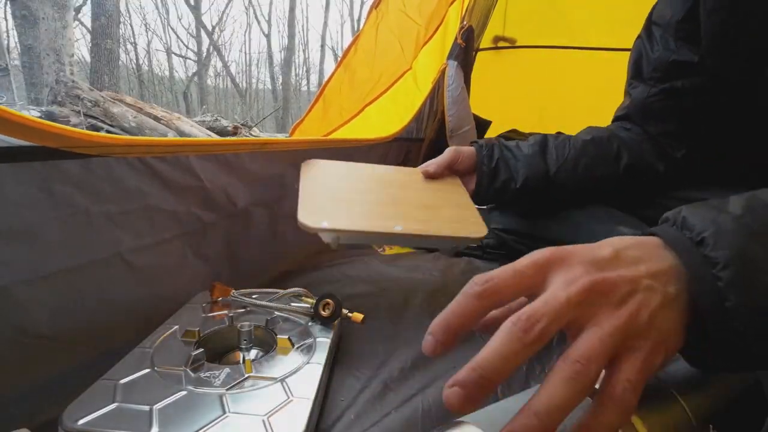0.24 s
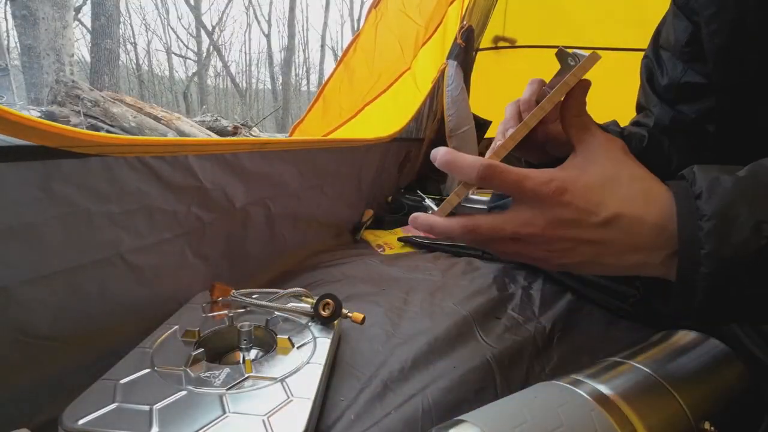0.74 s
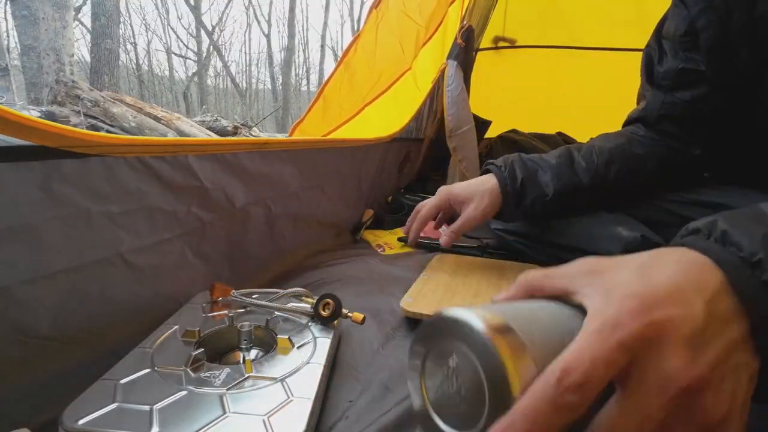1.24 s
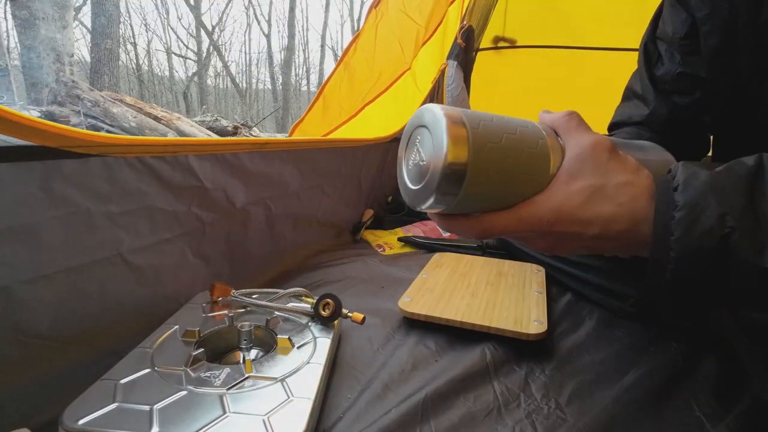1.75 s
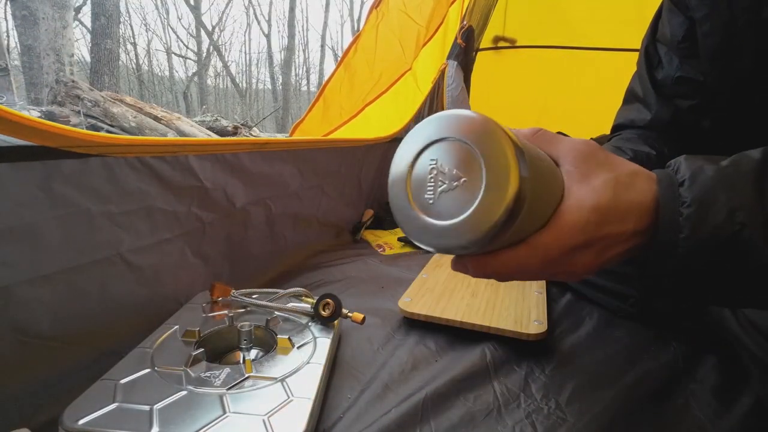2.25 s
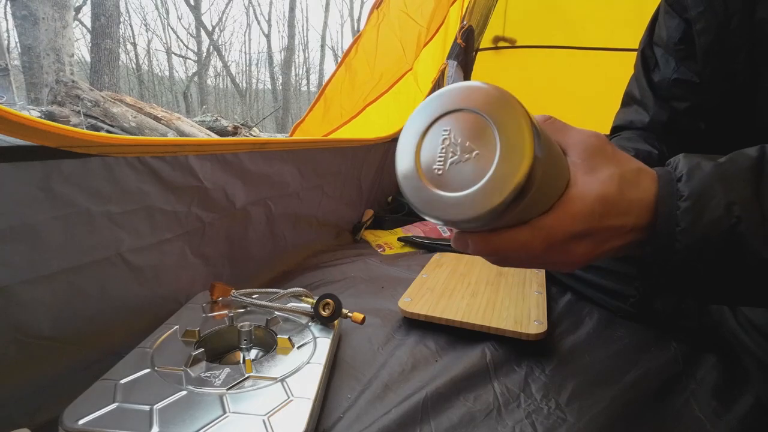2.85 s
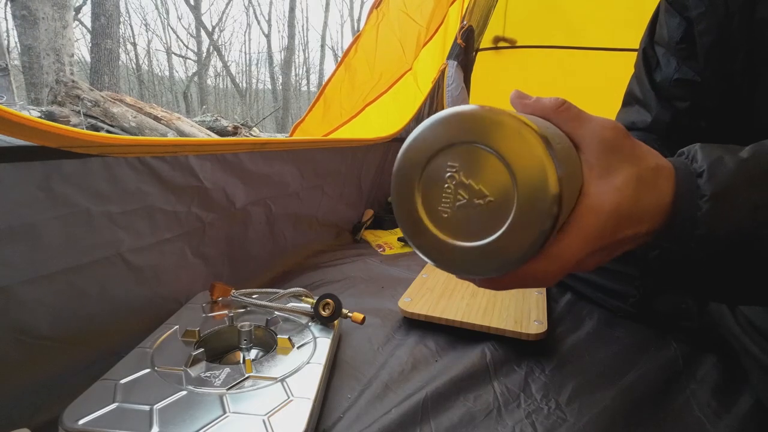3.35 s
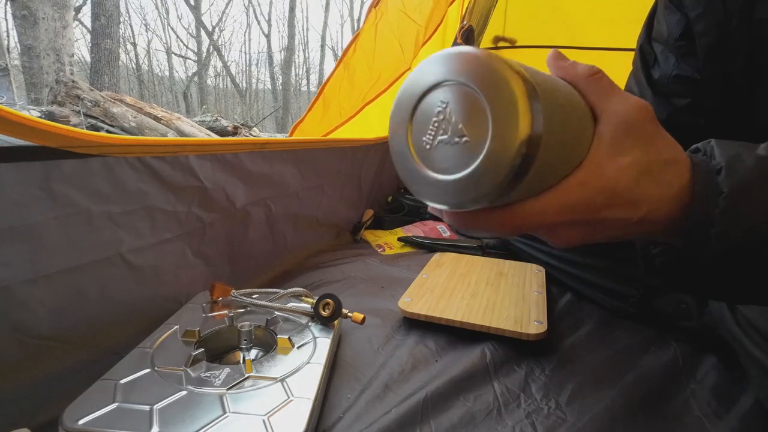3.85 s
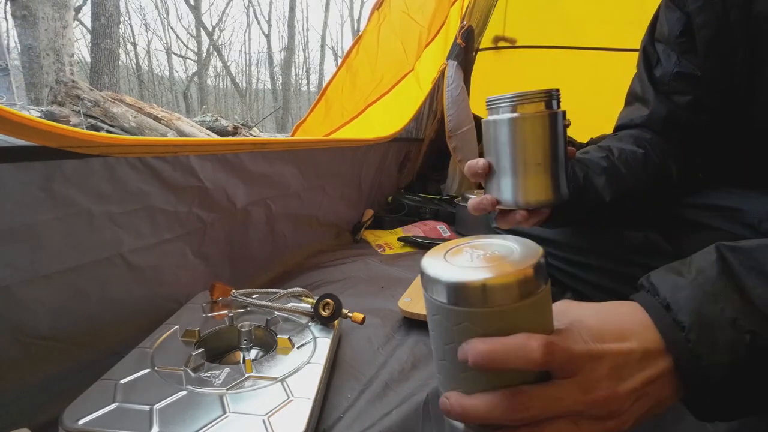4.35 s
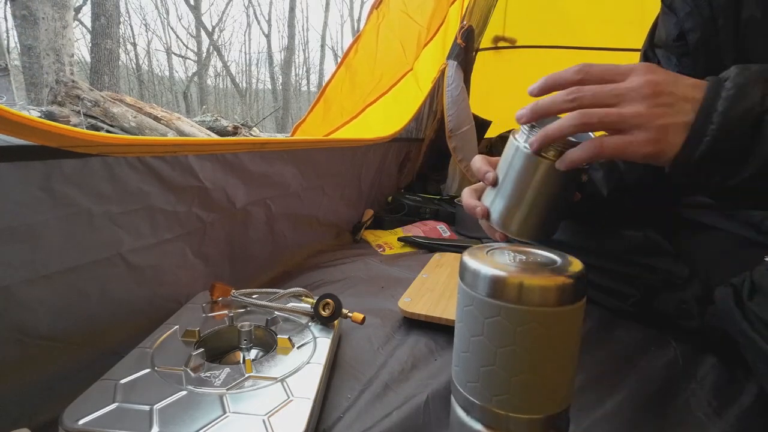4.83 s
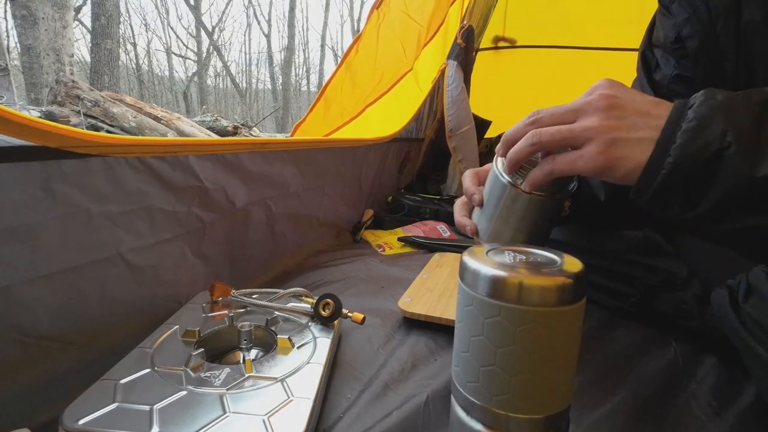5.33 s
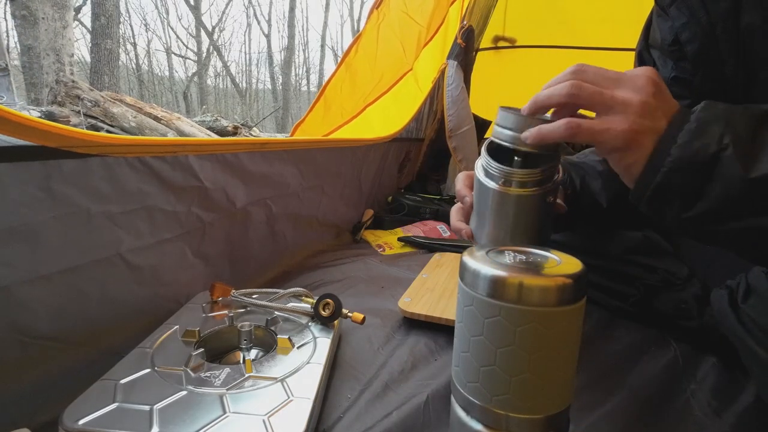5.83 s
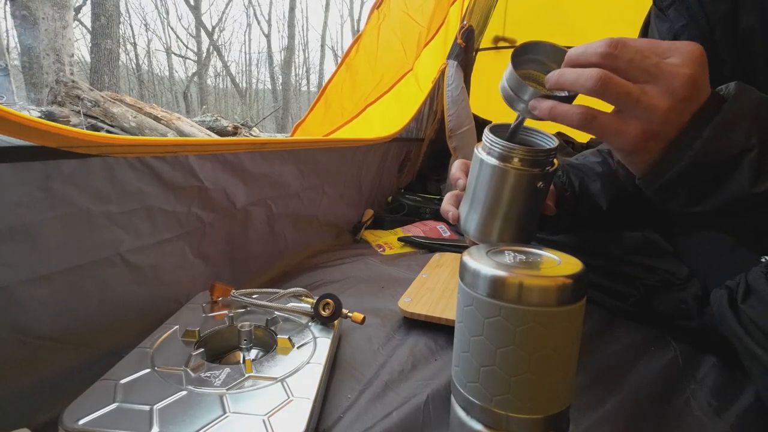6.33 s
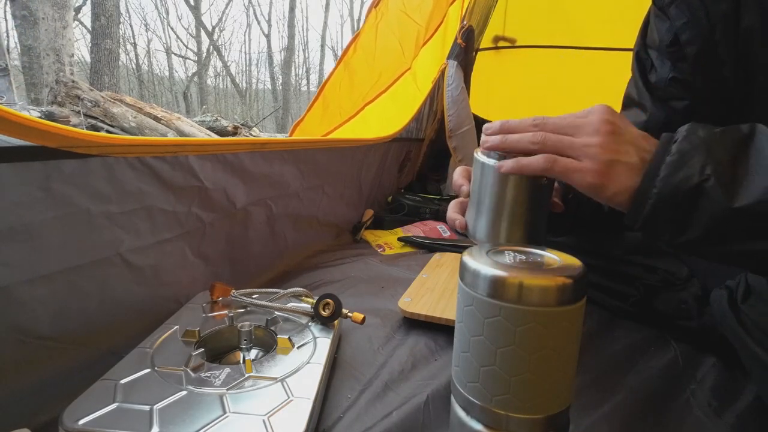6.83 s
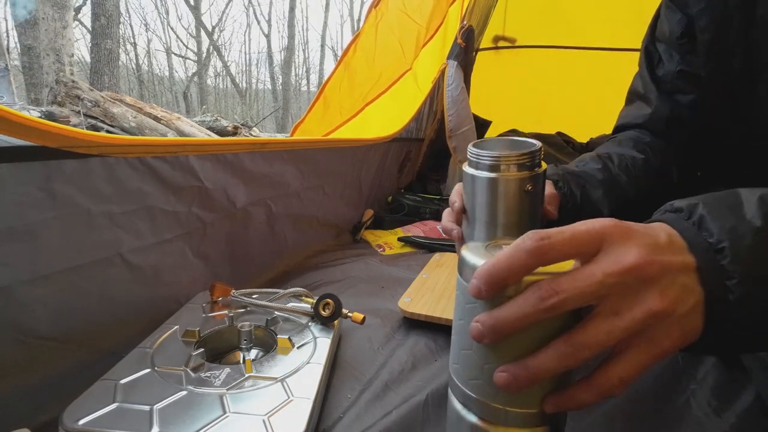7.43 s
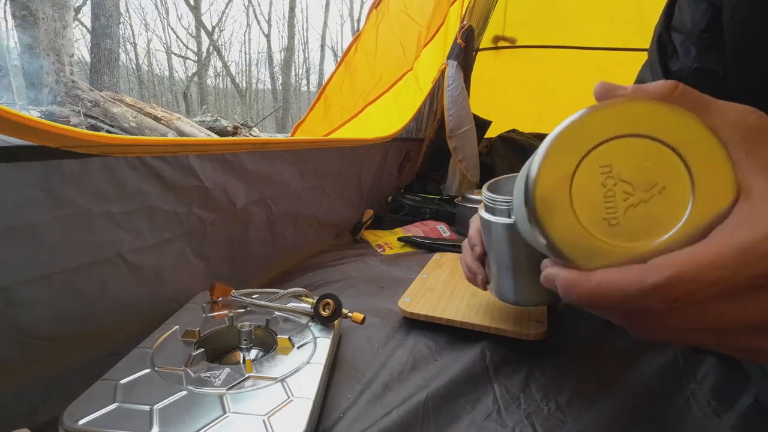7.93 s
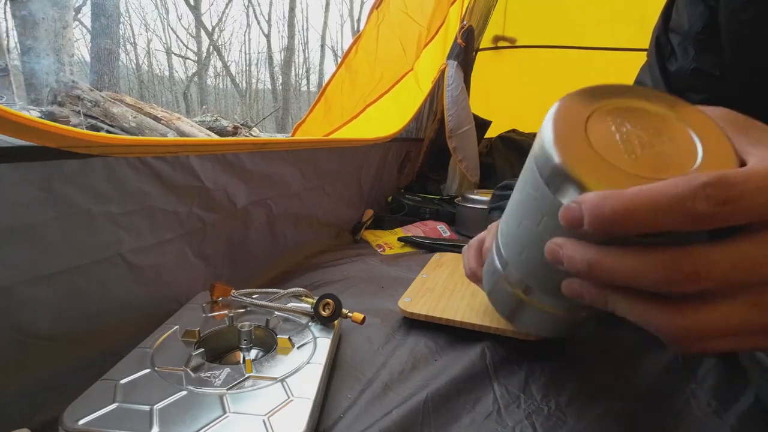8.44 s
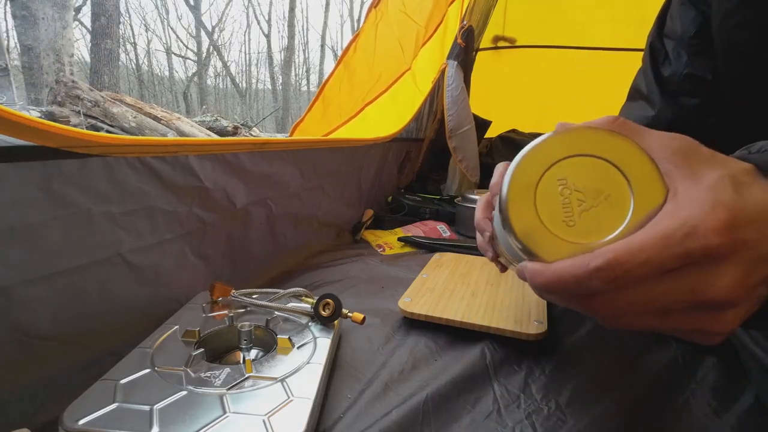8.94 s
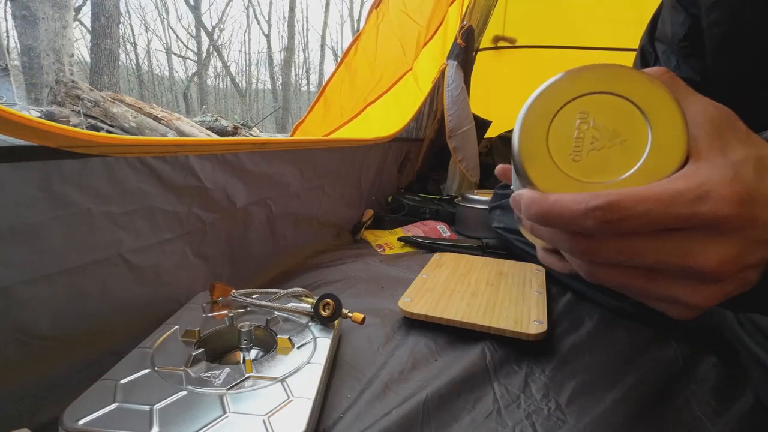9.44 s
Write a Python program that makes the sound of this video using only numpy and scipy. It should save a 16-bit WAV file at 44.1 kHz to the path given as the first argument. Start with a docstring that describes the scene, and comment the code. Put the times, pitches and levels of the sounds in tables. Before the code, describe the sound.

Close to a stereo microphone, light knocks and soft thuds on a wooden board and tent floor give way to the scrape of a steel thread being unscrewed. After a dull thump, a nested metal cup slides and clinks, its ringing quickly damped by fingers. Steel rims then clack together and the tumbler is screwed shut. Nylon sleeves brush nearby over the faint rumble and hiss of far woods.

```python
"""A steel tumbler, handled close to a two-port microphone inside a quiet tent.
It is laid down, unscrewed in short twists and closed again; the cup nested in it slides and clinks.
Rubbing and blows ring the steel walls and the air they enclose, and fingers damp the ringing.
A small wooden board and the floor cloth take dull taps, and nylon sleeves rustle nearby.
Outside, far off, the woods rumble and hiss."""
import sys
import numpy as np
from scipy import signal
from scipy.fft import rfft, irfft, next_fast_len
from scipy.io import wavfile
from scipy.ndimage import uniform_filter1d

SR = 44100
rng = np.random.default_rng(int(sys.argv[2]) if len(sys.argv) > 2 else 0)


def to_wav(s):
    """Save 16-bit WAV."""
    ch = np.atleast_2d(s).T  # columns
    pcm = np.round(np.clip(ch, -1, 1) * 32767)  # PCM
    wavfile.write(sys.argv[1], SR, pcm.astype(np.int16))


N = 426888
SIZE = next_fast_len(N + SR)  # room for the rings to die away
HZ = np.fft.rfftfreq(SIZE, 1 / SR)
CHATTER_T60_S = 0.038  # rattle after a blow on steel


def gain_of(db):
    """Decibels to gain."""
    return 10 ** (np.asarray(db) / 20)


def unit_rms(x):
    """Scales to rms 1."""
    return x / np.sqrt(np.mean(abs(x) ** 2) + 1e-20)


def curve(points, hz, column=1):
    """One column of a table, interpolated over log frequency."""
    table = np.transpose(points)
    return np.interp(np.log(hz + 1), np.log(table[0] + 1), table[column])


def colour(points):
    """Causal filter with the shape of the given spectrum: the phase follows from the log gain."""
    db = np.maximum(curve(points, abs(np.fft.fftfreq(4096, 1 / SR))), -90)
    log_response = np.conj(signal.hilbert(np.log(gain_of(db))))
    taps = np.fft.ifft(np.exp(log_response)).real[:2048]
    return unit_rms(rfft(taps, SIZE))


def dying_sines(modes):
    """One sine a mode, its t60 at least 10 ms, on two paths to the microphone that differ in phase."""
    hz, db, t60 = np.transpose(modes)[:, :, None]
    t = np.arange(SR // 3) / SR
    phase = 2 * np.pi * rng.random((2, len(modes), 1)) * [[[0]], [[1]]]
    return gain_of(db - 60 * t / np.maximum(t60, .01)) * np.sin(2 * np.pi * hz * t + phase)


def ringing(modes):
    """Filter with the response of all modes together."""
    return unit_rms(rfft(dying_sines(modes).sum(1), SIZE))


def grain(spread_db, span_s):
    """Two noises that share one flicker: rough spots catch and let go."""
    flicker = unit_rms(uniform_filter1d(rng.exponential(1, N) - 1, max(round(span_s * SR), 1)))
    return unit_rms(rng.standard_normal((2, N)) * gain_of(spread_db * np.clip(flicker, -3, 3)))


def blows(rows, t60=CHATTER_T60_S):
    """For each level column, a train of strikes and the dying envelope of the chatter after them."""
    strikes = np.zeros((len(rows[0]) - 1, N))
    for start, db, *offsets_db in rows:
        strikes[:, round(start * SR)] += gain_of(db + np.array([0, *offsets_db]))
    decay = gain_of(-60 * np.arange(SR // 8) / SR / t60)
    return strikes, abs(signal.oaconvolve(strikes, decay[None], axes=1)[:, :N])


def strokes(rows, grip_s=.025, rise_db=30.5, fall_db=31):
    """Stroke envelopes: a quick grip, a push, then two let-off times that each fall by fall_db."""
    out = np.zeros((len(rows[0]) - 4, N))
    for start, push, let_off, first_db, last_db, *offsets_db in rows:
        corners = np.cumsum([start - grip_s, grip_s, push, 2 * let_off])
        at = np.arange(max(round(corners[0] * SR), 0), min(round(corners[-1] * SR), N))
        db = np.interp(at / SR, corners, [first_db - rise_db, first_db, last_db, last_db - 2 * fall_db])
        out[:, at] += gain_of(db + np.array([0, *offsets_db])[:, None])
    return out


def ports(paths, likeness, lead, left_db):
    """The right port hears part of what the left hears, shifted in phase, and part of a second path."""
    likeness = np.clip(likeness, -1, 1)
    right = likeness * np.exp(1j * lead) * paths[0] + np.sqrt(1 - likeness ** 2) * paths[1]
    tilt = gain_of(left_db / 2)
    return irfft(np.array([paths[0] * tilt, right / tilt]), SIZE)[:, :N]


# The distant woods, heard from inside the tent. Each row: frequency in Hz, relative level in dB.
WOODS_SPECTRUM = [(12, -46), (20, -6), (83, -5.5), (134, -6.5), (228, -15), (328, -21.5), (377, -19),
                  (624, -28.5), (802, -28), (873, -38.5), (949, -33), (1120, -40.5), (1220, -35.5),
                  (14300, -55), (16000, -60)]
# The woods at the two ports. Each row: frequency in Hz, left-right likeness from -1 to 1.
WOODS_LIKENESS = [(60, 0.99), (180, 0.96), (550, 0.43), (1650, -0.38), (4970, -0.67), (15000, -0.65)]


def woods(level_db=-52.5):
    """Far rumble and hiss of the woods, swelling slowly."""
    t = np.arange(N) / SR
    waves = [np.sin(2 * np.pi * (hz * t + rng.random())) / np.sqrt(hz) for hz in np.geomspace(.5, 12, 12)]
    swell = gain_of(unit_rms(sum(waves)))
    rumble = rfft(rng.standard_normal((2, N)) * swell, SIZE) * gain_of(curve(WOODS_SPECTRUM, HZ))
    return gain_of(level_db) * unit_rms(ports(rumble, curve(WOODS_LIKENESS, HZ), lead=0, left_db=0.5))


# Nylon up close, its bright rustle and its dull rub. Each row: frequency in Hz, relative level in dB.
NYLON_SPECTRUM = [(1100, -14), (1800, -5.5), (3000, -5.5), (5000, -2.5), (8500, -5.5), (12000, -8),
                  (15300, -9), (16500, -16)]
RUB_SPECTRUM = [(300, -33), (520, 3), (900, 1), (1300, 1.5), (1900, 5.5), (2600, 2.5), (5000, -15.5)]
# Cloth that keeps moving near the microphone. Each row: time in seconds, rustle level in dB.
STEADY_RUSTLE = [(0, -52), (.25, -52), (.75, -57.5), (.78, -68), (.87, -62), (.97, -54.5), (1.4, -54.5),
                 (1.56, -58.5), (1.72, -55.5), (1.75, -65.5), (2.64, -66.5), (3.6, -62.5), (3.751, -73),
                 (4.25, -60.5), (4.45, -58.5), (4.47, -53), (5.03, -60), (5.08, -65.5), (5.3, -69),
                 (5.55, -67), (6.3, -72.5), (6.95, -68.5), (7.48, -66), (8., -66), (8.17, -70),
                 (8.68, -69.5), (9.68, -57.5)]
# Single brushes of a sleeve. Each row: start, push and let-off in seconds, rustle in dB at the start
# and end of the push, dull rub in dB against the rustle.
SLEEVE_BRUSHES = [(.05, 0.12, 0.13, -45.5, -52.5, 1.5), (1.075, 0.03, 0.025, -54.5, -43.5, 3.5),
                  (1.14, .02, 0.055, -47, -44, 4.5), (1.205, .01, 0.047, -55, -55, 4),
                  (1.265, 0.023, 0.024, -48, -38.5, -3.5), (1.32, 0.018, 0.041, -56, -47.5, 0.5),
                  (1.48, 0.015, 0.045, -56, -48, -4), (4.258, 0.0087, 0.02, -69, -45, 1.5),
                  (4.34, 0.019, 0.024, -57, -39, -3), (4.59, 0.13, 0.12, -52.5, -50, -20),
                  (7.03, 0.043, 0.43, -67, -57.5, -15), (7.61, 0.097, .12, -59.5, -45.5, -10.5),
                  (8.505, 0.027, .06, -83, -61, -10)]


def sleeves():
    """Nylon fibres brush past each other: a bright rustle and a duller, coarser rub."""
    steady = gain_of(np.interp(np.arange(N) / SR, *np.transpose(STEADY_RUSTLE)))
    rustle, rub = strokes(SLEEVE_BRUSHES) + steady * gain_of([[0], [-9]])
    bright = colour(NYLON_SPECTRUM) * rfft(rustle * grain(spread_db=1.0, span_s=0.0058), SIZE)
    dull = colour(RUB_SPECTRUM) * rfft(rub * grain(spread_db=4.0, span_s=0.014), SIZE)
    return bright + dull


# Modes of the ground under the tent, and of the board.
# Each row: pitch in Hz, relative level in dB, t60 in seconds.
GROUND_MODES = [(151, 0, 0.06), (235, 0.0032, 0.067)]
BOARD_MODES = [(513, 9, 0.038), (715, 2, 0.067), (1000, 6.5, 0.045)]
# Thuds and taps on the board and the floor cloth, close by.
# Each row: start in seconds, relative blow in dB, then offsets in dB for woody knock and puff.
BOARD_THUDS = [(.053, -21, -27, -24), (.13, -31, -19, -18), (1.004, -46, -28, -2), (1.273, -30.5, -9, -5),
               (1.313, -43, 3.5, 3), (1.336, -35.5, -7.5, -1), (1.355, -45, -3.5, -8),
               (1.493, -48, -10.5, 7), (1.589, -52.5, -3, 5.5), (1.622, -45.5, -15, 0.5),
               (4.347, -38, -10.5, -11), (7.075, -52, -1.5, 2.5), (7.389, -67, -19, 8),
               (8.102, -40.5, -20, -29)]


def board():
    """A low push into the ground, a woody knock and a short puff from the cloth."""
    strikes, chatter = blows(BOARD_THUDS, t60=0.1)
    push = ringing(GROUND_MODES)[:1] * rfft(gain_of(19) * strikes[0], SIZE)
    wood = ringing(BOARD_MODES)
    rattle = gain_of(-1) * chatter[1] * rng.standard_normal((2, N))
    knock = wood * rfft(gain_of(17.5) * strikes[1] + rattle, SIZE)
    puff = colour(NYLON_SPECTRUM) * rfft(gain_of(-2) * chatter[2] * rng.standard_normal((2, N)), SIZE)
    return push + knock + puff


# Modes of rim against rim, and of a hard edge on the board.
# Each row: pitch in Hz, relative level in dB, t60 in seconds.
RIM_MODES = [(990, -0.5, 0.06), (1157, -0.5, 0.13), (1440, -8, 0.067)]
EDGE_MODES = [(1240, -19, .04), (2200, -1, 0.023), (3610, -7, .02), (3870, 1, 0.015)]
# Rim meets rim near the microphone. Each row: start in seconds, relative blow in dB.
RIM_BLOWS = [(.1274, -42.5), (2.0607, -34), (2.878, -42), (3.063, -40.5), (3.27, -22.5), (4.355, -41.5),
             (8.3327, -54), (8.7166, -31), (8.7507, -20.5), (8.8649, -23.5), (8.9073, -36), (9.1368, -42),
             (9.3736, -45), (9.511, -38)]


def rims():
    """Rims clack with a little rattle, and a hard edge ticks once on the board."""
    strikes, chatter = blows(RIM_BLOWS)
    rim = ringing(RIM_MODES)
    rattle = gain_of(-4) * chatter * rng.standard_normal((2, N))
    clacks = rim * rfft(gain_of(16) * strikes + rattle, SIZE)
    edge_strike, _ = blows([(.045, -4)])
    return clacks + ringing(EDGE_MODES) * rfft(edge_strike, SIZE)


# Tones that hang on in the steel, close by.
# Each row: start in seconds, pitch in Hz, level in dB, length in seconds.
LINGERING_TONES = [(1.96, 2480, -40, 0.06), (3.078, 7500, -48.5, 0.12), (3.272, 1763, -37, 0.18),
                   (3.306, 2625, -37, 0.1), (3.6, 1770, -37, 0.065), (4.36, 4640, -46.5, .12),
                   (5.908, 1570, -44.5, 0.12), (6.058, 1607, -49, 0.16), (8.72, 6363, -20, 0.083),
                   (8.727, 3989, -26.5, 0.23), (8.91, 3989, -38, 0.094), (9.52, 2800, -46, 0.084),
                   (6.73, 7214, -50, 0.08), (6.07, 5324, -40.5, 0.1), (8.73, 4339, -30.5, 0.15),
                   (5.93, 7540, -55, 0.11), (6.06, 7540, -53, .17), (6.57, 2622, -36, .03)]


def lingering(fall_db=19):
    """One wall mode sings on alone until a finger stops it; each path hears it with its own phase."""
    out = np.zeros((2, SIZE))
    phases = rng.random((len(LINGERING_TONES), 2, 1))
    for (start, hz, db, length), phase in zip(LINGERING_TONES, phases):
        t = np.arange(round(length * SR)) / SR
        tone = gain_of(db - fall_db * t / length) * np.sin(2 * np.pi * (hz * t + phase))
        out[:, round(start * SR):][:, :len(t)] += tone * signal.windows.tukey(len(t), .2)
    return rfft(out)


def thread_friction(patchy_db=4.0):
    """The contact point creeps along the thread, so the favoured bands shift from moment to moment."""
    bands = signal.stft(grain(spread_db=2.0, span_s=0.0017), nperseg=256, noverlap=128)[2]
    patches = uniform_filter1d(rng.standard_normal(bands.shape[1:]), size=3, axis=0)
    patches = unit_rms(uniform_filter1d(patches, size=10, axis=1))
    friction = signal.istft(bands * gain_of(patchy_db * patches), nperseg=256, noverlap=128)[1]
    return unit_rms(friction[:, :N])


def free_rings(hz, modes, hits, loose_s, focus_db_per_octave=28):
    """Each blow rings the loose wall, most near the pitch its place favours, until a touch damps it."""
    sines = dying_sines(np.transpose([hz, modes[:, 1], modes[:, 2]]))
    t = np.arange(sines.shape[-1]) / SR
    damping = 1 / (1 + np.exp((t - loose_s) / 0.0073))
    out = np.zeros((2, SIZE))
    scatter_db = 3 * rng.standard_normal((len(hits), len(hz)))  # no two blows land alike
    for (start, db, _, lowest_db, _, free_db, favoured_hz), chance_db in zip(hits, scatter_db):
        off_pitch_db = np.minimum(focus_db_per_octave * abs(np.log2(hz / favoured_hz)), 18)
        weight_db = free_db + chance_db - off_pitch_db
        weight_db[0] = lowest_db - 21  # the lowest ring has its own level
        out[:, round(start * SR):][:, :len(t)] += gain_of(db + weight_db) @ sines * damping
    return rfft(out)


# Steel on steel up close, its bright scrape and its dull one.
# Each row: frequency in Hz, relative level in dB.
BRIGHT_SCRAPE = [(1120, -34), (1900, -2.5), (2040, -6), (2530, -10.5), (3100, -7), (5020, -9.5),
                 (5490, -4.5), (6270, -8.5), (9630, -15.5), (10500, -13.5), (16000, -17.5)]
LOW_SCRAPE = [(71, -44), (120, -10.5), (210, -17), (244, -5.5), (644, -12), (913, -18.5), (1500, -5.5),
              (1950, -16), (3300, -120)]


def steel_vessel(hz, modes, hollow_modes, rubs, hits, friction,
                 modes_db, strike_db, chatter_db, rub_db, sheen_db, dull_db, loose_s):
    """Rubs and blows drive four parts, in order: held wall, hollow air, lowest ring and high sheen."""
    hz, modes = np.array(hz), np.array(modes)
    strikes, chatter = blows([hit[:5] for hit in hits])
    strikes *= gain_of(strike_db)[:, None]
    rubbing = gain_of(rub_db) * strokes(rubs)
    forces = gain_of(chatter_db) * chatter
    forces[:3] += rubbing
    forces[3] += gain_of(sheen_db) * rubbing[0]
    grip = 0.33  # share of the ring time left while fingers hold the wall
    held = np.transpose([hz, modes[:, 0], grip * modes[:, 2]])
    wall = colour(BRIGHT_SCRAPE) + gain_of(modes_db) * ringing(held[1:])
    hollow = gain_of(dull_db) * colour(LOW_SCRAPE) + ringing(hollow_modes)
    twin = held[:1] * [1.04, 1, .3]  # slightly sharper and shorter than the lowest ring
    lowest = ringing(held[:1]) + gain_of(-10.5) * ringing(twin)
    sheen_share = np.clip((HZ - 7500) / 1000 + .5, 0, 1)  # the wall above about 7500 Hz
    parts = [wall * (1 - sheen_share), hollow, lowest, wall * sheen_share]
    driven = sum(unit_rms(part) * rfft(friction * force + strike, SIZE)
                 for part, force, strike in zip(parts, forces, strikes))
    bass_cut = HZ ** 3 / (HZ ** 3 + 197.0 ** 3)  # the vessels' sound is thinned below about 200 Hz
    return bass_cut * (driven + free_rings(hz, modes, hits, loose_s))


# The cup's wall modes, lowest first. Each entry: pitch in Hz.
CUP_PITCHES = [1616, 2622, 2907, 4620, 5324, 5650, 5819, 6578, 6850, 7214, 7540, 8027, 8791, 9270, 10550,
               11730, 12940, 13450]
# The same modes. Each row: relative level in dB when held and when free, free t60 in seconds.
CUP_MODES = [(0, -18.5, 0.24), (-16, -5, 0.17), (8, -31, 0.049), (-3, -2.5, 0.18), (5.5, 2, 0.074),
             (-22, -6, 0.18), (1, -16, 0.18), (-19, -22, 0.096), (-32.5, -5.5, 0.11), (-14, -8.5, 0.2),
             (-11, -25.5, 0.52), (-1.5, -11, 0.14), (-6.5, -11.5, 0.092), (-6, -19, 0.11), (-6.5, -8, 0.17),
             (-38.5, -7.5, 0.14), (-9.5, -35, 0.17), (-16.5, -17.5, .1)]
# Air in the gap as the cup moves. Each row: pitch in Hz, relative level in dB, t60 in seconds.
CUP_AIR = [(380, -9.5, 0.011), (498, 14, 0.0071), (651, -8.5, 0.032), (940, -14, 0.1)]
# The cup slides, close to the microphone. Each row: start, push and let-off in seconds, relative
# pressure in dB at the start and end of the push, then offsets in dB for hollow air and lowest ring.
CUP_SLIDES = [(5.505, 0.015, .03, -56, -56, 9, 0), (5.551, 0.045, .025, -40.5, -33.5, -4.5, -10.5),
              (5.829, 0.079, 0.068, -43.5, -31.5, -6.5, -8), (6.059, 0.012, 0.088, -31.5, -30, -31, -0.5),
              (6.586, .015, .08, -26, -31.5, -30, -1), (6.63, 0.085, .07, -47, -30.5, -1.5, -6),
              (6.89, 0.018, 0.021, -46, -46, -9, 3)]
# The cup clinks. Each row: start in seconds, relative blow in dB, offsets in dB for hollow air,
# lowest ring, sheen and free ring, then favoured pitch in Hz.
CUP_CLINKS = [(1.856, -46, -15, -7, -23.5, -9, 2570), (4.2624, -40, -21, -30, -16, -4, 5530),
              (4.355, -30.5, -3.5, -34, -9, -3, 6800), (4.8618, -57.5, 7, 1, -13, -10, 3870),
              (4.9669, -54, 6, 4, -6.5, -10, 2650), (5.6479, -22, -26.5, -34, -19, -5, 2840),
              (5.6587, -18.5, -4, -16, -4.5, -13, 4620), (5.82, -43, 4, -5, -7, -17, 5500),
              (5.8364, -34.5, -5, -12, -18, -15, 5610), (5.8572, -34.5, -2, -2.5, -14, -21, 5650),
              (5.8738, -29, 0, -17, -19, 0, 4610), (5.9107, -32, -11, -6, -16.5, -6, 6060),
              (6.042, -16.5, -48.5, -12.5, -1, -27.5, 5600), (6.0559, -27, -37, -3.5, -6, -15, 8000),
              (6.0644, -28, -52.5, -27, -29.5, 3, 7940), (6.569, -18.5, -6, -18.5, -8, -0.5, 2630),
              (6.5786, -16.5, -35, -14, 0, -5, 5820), (6.6072, -23, -3.5, -6.5, 3, 2, 5740),
              (6.662, -25.5, -2, -10.5, -14, -0.5, 5570), (6.711, -26.5, -13, -12, 2, 7, 5470),
              (6.723, -25.5, -20.5, -16, 3, -12, 5500), (6.8764, -32, -10.5, -9.5, -22, -7, 3800),
              (6.9066, -25, -4, -19.5, -12, -12, 5400)]


def cup(friction):
    """The nested cup slides and clinks, ringing its wall and the air in the gap."""
    return steel_vessel(CUP_PITCHES, CUP_MODES, CUP_AIR, CUP_SLIDES, CUP_CLINKS, friction,
                        modes_db=0.0, strike_db=[4.2, 16.9, 27.5, 2.4], chatter_db=-7.5,
                        rub_db=-6.0, sheen_db=-1.5, dull_db=-7.5, loose_s=0.046)


# The tumbler's wall modes, lowest first. Each entry: pitch in Hz.
TUMBLER_PITCHES = [1739, 2020, 2625, 3047, 3569, 3989, 4339, 4660, 5330, 5540, 5820, 6239, 6363, 6830, 7461,
                   7610, 8032, 8750, 9340, 10600, 11460, 12930]
# The same modes. Each row: relative level in dB when held and when free, free t60 in seconds.
TUMBLER_MODES = [(0, 0.5, 0.22), (2, -42, 0.037), (-27, -9, 0.35), (-18, -6, 0.1), (-16, -10, 0.23),
                 (-15.5, -18.5, 0.21), (-25.5, -22.5, 0.5), (-8.5, -5.5, 0.091), (-16.5, -10.5, 0.26),
                 (-4, 0.5, 0.054), (-4, 1, 0.091), (-16.5, -13.5, 0.076), (-22.5, -0.5, 0.11),
                 (-20, -17, 0.51), (-22, -14, 0.18), (-23, -7, 0.31), (-19, -4, 0.064), (-26, -9, 0.24),
                 (-18.5, -17, 0.12), (-12.5, -22.5, 0.11), (-19, -13, 0.097), (-16, -17, 0.13)]
# Air inside the nested vessels. Each row: pitch in Hz, relative level in dB, t60 in seconds.
TUMBLER_AIR = [(248.5, -2.5, 0.042), (313, -16, 0.025), (470, -9.5, 0.0054)]
# The thread turns, close to the microphone. Each row: start, push and let-off in seconds, relative
# pressure in dB at the start and end of the push, then offsets in dB for hollow air and lowest ring.
THREAD_TWISTS = [(1.895, 0.053, 0.055, -55, -30.5, 1.5, -7.5), (2.015, 0.053, .03, -47.5, -47, 3, 1.5),
                 (2.074, 0.0081, 0.086, -47, -44, -7, 2.5), (2.12, 0.097, 0.078, -59, -54.5, 3, -10),
                 (2.394, 0.092, 0.13, -41.5, -33, -3.5, 0), (2.669, 0.094, 0.13, -38.5, -32, -9.5, 2.5),
                 (2.906, 0.039, .14, -41, -31, -7, 2), (3.041, 0.032, 0.044, -66, -39.5, 4, -13),
                 (3.189, 0.038, 0.073, -44, -32.5, -7.5, 0), (3.26, 0.016, 0.12, -37.5, -28, -9, -3.5),
                 (3.525, 0.066, 0.063, -50, -41.5, 5.5, -2), (8.506, 0.013, 0.013, -64.5, -48, 14, 5),
                 (8.733, 0.021, 0.069, -21.5, -28.5, -2, 1.5), (8.839, 0.065, 0.091, -44, -26, -0.5, 3),
                 (8.998, 0.082, 0.055, -52.5, -47, -5, -3.5), (9.099, 0.049, 0.24, -42, -36, -6.5, 2.5),
                 (9.23, 0.068, 0.034, -65, -52, -4, 2), (9.331, 0.14, 0.08, -44.5, -36.5, -8, 5.5),
                 (9.523, 0.0043, .04, -33, -43, -0.5, -19), (9.579, 0.031, .03, -52, -62.5, 4, 0),
                 (9.662, 0.014, .03, -58.5, -49, 7, 16)]
# Knocks on the tumbler. Each row: start in seconds, relative blow in dB, offsets in dB for hollow air,
# lowest ring, sheen and free ring, then favoured pitch in Hz.
TUMBLER_KNOCKS = [(.046, -30, 2, -19, -26, -12, 3670), (0.1262, -38, 5, -27, -17, -0.5, 4500),
                  (1.947, -18, -2, -0.5, -31, -18, 3500), (2.018, -39.5, 6, -4, -13, -14, 5830),
                  (2.0603, -22.5, 5.5, -36, -21, -21, 2380), (2.1763, -45, -14, -14, 2, -15, 4400),
                  (2.221, -33, 3, -16, -12, -21, 2300), (2.5008, -29.5, -13, -4, -14, 0, 3720),
                  (2.753, -24.5, -26, -17, -25, -16, 5520), (2.877, -35, 10, 2, -20, -23, 2370),
                  (2.944, -59, -11, -17, -16, -15, 3500), (3.063, -26.5, -3, -15, -20, -18, 3730),
                  (3.264, -21, -23.5, -8, 0.5, -3.5, 6340), (3.3184, -27, -1, -13, -12, -12.5, 2620),
                  (3.381, -43, 11, -10, -18, -10, 3990), (3.522, -49, 14, -12, -5, -10, 5540),
                  (3.5968, -38, -39, 5, 0, 3, 5670), (7.3348, -44.5, 8, -2, -22, -5.5, 2644),
                  (7.7327, -35.5, 2, -7, -16, -11, 5350), (8.026, -48.5, 7, 0, -15.5, -6, 5600),
                  (8.3325, -53.5, 14, 2, -17, 0.5, 2800), (8.514, -40.5, -4, 7, -21, -1, 2600),
                  (8.7171, -7, 0, -11, -5, -1.5, 3220), (8.729, -23, -25, 1.5, -9, 10.5, 3100),
                  (8.7523, -24, 1, -21, -24, 2, 6300), (8.8656, -25.5, -19, 9.5, -14, 3, 3050),
                  (8.8886, -18, -12, -3.5, -1, 1.5, 3040), (8.9057, -12, -11, -24, -4, -21, 4620),
                  (8.95, -28.5, 6, -11, 0, -10, 5700), (9.1364, -35.5, -24, 7, 2, -4, 5350),
                  (9.1839, -43.5, 19.5, -19, 8, 2, 7600), (9.281, -34.5, 3.5, -30, -7, -11, 3130),
                  (9.3248, -43, 15, -2, 7, -6.5, 5360), (9.3727, -40.5, 21, 0, -12, -6, 5300),
                  (9.4269, -38.5, -28, 4, 13, 2, 5450), (9.511, -19.5, -18, -2, -8, -10, 3050),
                  (9.6067, -45, -9, 7.5, 4, -10, 7720), (9.669, -47, 12, 12, -23, 3, 2330)]


def tumbler(friction):
    """The thread scrapes in short twists, and knocks ring the steel wall and the air inside."""
    return steel_vessel(TUMBLER_PITCHES, TUMBLER_MODES, TUMBLER_AIR, THREAD_TWISTS, TUMBLER_KNOCKS,
                        friction, modes_db=-1.5, strike_db=[3.8, 10.0, 19.4, 2.1], chatter_db=-4.5,
                        rub_db=1.0, sheen_db=-2.5, dull_db=-8, loose_s=.065)


# The microphone's two ports, for sources close by. Each row: frequency in Hz, left-right likeness,
# lead of the right port in radians, left minus right in dB.
NEAR_PORTS = [(100, 0.94, .1, 1), (350, 0.95, 0.17, 0), (770, 0.83, 1.9, -1), (1050, 0.83, 1.64, 0),
              (1730, 0.73, 0.49, -2.5), (2400, 0.15, 1.1, 1.5), (3620, 0.1, 0.53, -2.),
              (5250, .3, 2.87, -3), (8000, 0.22, 2.03, 0), (15000, .15, 4.9, 0.5)]


def scene():
    """The handling sits close to the two ports; the woods lie far around the tent."""
    friction = thread_friction()
    near = tumbler(friction) + cup(friction) + lingering() + rims() + board() + sleeves()
    likeness, lead, left_db = (curve(NEAR_PORTS, HZ, column) for column in (1, 2, 3))
    return ports(near, likeness, lead, left_db) + woods()


def record(dry):
    """The recorder's band ends at 16050 Hz."""
    lowpass = signal.firwin(511, 16050, window=("kaiser", 9), fs=SR)
    return signal.oaconvolve(dry, lowpass[None], "same", axes=1)


dry = scene()
out = record(dry)
to_wav(out)
```